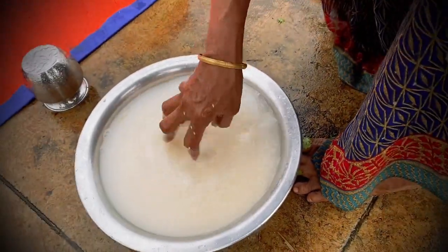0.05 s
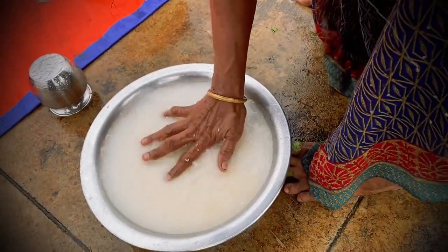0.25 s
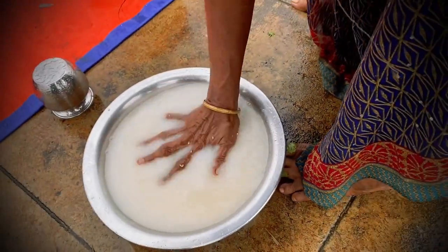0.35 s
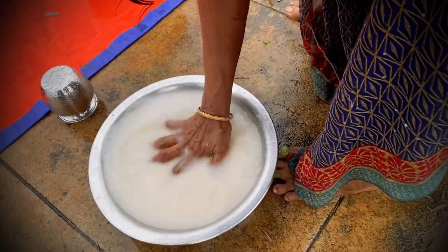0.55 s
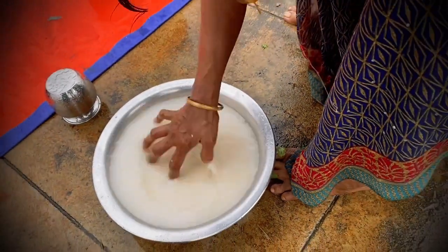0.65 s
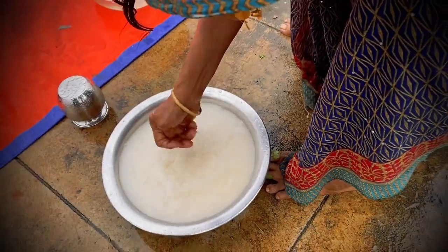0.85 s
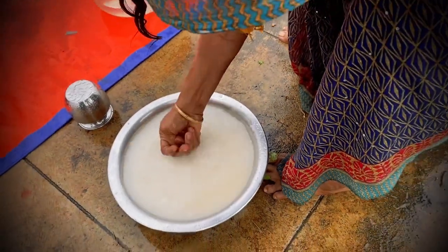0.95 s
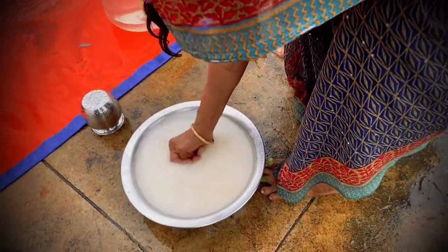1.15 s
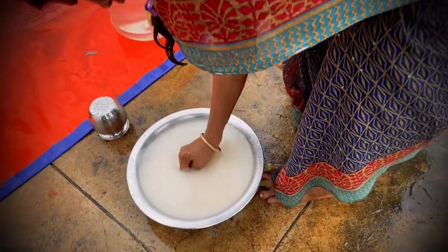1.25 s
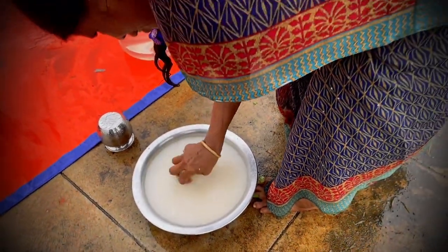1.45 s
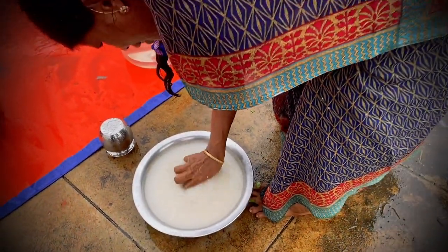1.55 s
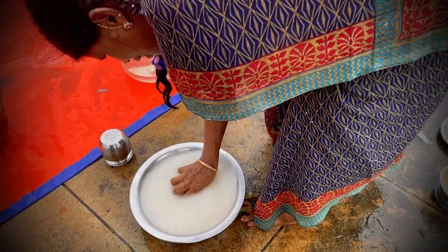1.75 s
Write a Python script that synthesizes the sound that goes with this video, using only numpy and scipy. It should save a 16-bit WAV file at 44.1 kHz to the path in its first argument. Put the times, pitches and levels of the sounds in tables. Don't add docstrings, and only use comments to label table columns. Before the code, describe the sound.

Wet rice is stirred by hand in a steel basin of water outdoors, heard from about a metre above. A slosh and grainy swish open it; at 0.2 s a finger knocks the phone hard, a sharp click with a quick falling sweep, by far the loudest event. Grains pour, bubbles pop from 0.3 to 0.9 s, then quieter swishing, a last soft pour and bubbles near 1.6 s, over faint rumble and hiss.

```python
import sys
import numpy as np
from scipy import signal
from scipy.fft import rfft, irfft
from scipy.io import wavfile
from scipy.ndimage import uniform_filter1d

SR = 44100
rng = np.random.default_rng(int(sys.argv[2]) if len(sys.argv) > 2 else 0)


def level_to_linear(level):
    exponent = np.asarray(level, float) / 20
    return 10 ** exponent


def digitize_waveform(pressure):
    field = np.atleast_2d(pressure).T
    bounded = np.clip(field, -1, 1)
    quanta = np.round(bounded * 32767).astype(np.int16)
    wavfile.write(sys.argv[1], SR, quanta)


N = 79380

# [t/s, swish level/dB, slosh level/dB]
STIR_STROKES = [(0, -50.5, -39.5), (.03, -54, -53), (.16, -52.5, -48.5), (.23, -63.5, -58.5),
                (.38, -52.5, -50.5), (.54, -54.5, -51.5), (.63, -55, -47.5), (.69, -54, -54.5),
                (.78, -53, -62), (.9, -55, -61.5), (1.18, -55.5, -64.5), (1.5, -54, -62.5),
                (1.58, -55, -57.5), (1.8, -54.5, -65)]
# [f/Hz, level/dB]
SWISH_SPECTRUM = [(250, -19.5), (462, -12), (2050, -2), (2620, -4), (7600, -14), (8500, -14.5),
                  (10800, -18), (12800, -20)]
SWISH_TOP_HZ, SWISH_LIKENESS, SWISH_PAN_DB = 12600, 0.13, 3
FLICKER_DB, FLICKER_PER_S, STIPPLE_DB, STIPPLE_PER_S = .8, 60, 1.1, 200
FIZZ_PER_S, FIZZ_DB, FIZZ_SPREAD_DB = 1500, -7, 2.5

# [t/s, level/dB, ring f/Hz, left minus right
# level/dB]
GRAIN_SNAPS = [(.2622, -46, 2200, -1), (.2631, -38, 11000, -1), (.2633, -36, 6100, -1),
               (.2634, -54, 15200, 0), (.2660, -47, 6300, -1), (.2695, -50, 6300, -1),
               (.9627, -48, 9000, 2), (.9636, -44, 10700, 2), (.9638, -47, 4600, 2), (.9640, -59, 15300, 0),
               (.9688, -43, 6000, 4), (.9686, -49, 10300, 2), (.9686, -60, 15300, 0), (.9710, -54, 6500, 2),
               (.9752, -48, 6100, 3), (1.633, -62, 15300, 0),
               (.029, -69, 4500, 2), (.045, -52, 4300, 6), (.118, -50, 6860, 0), (0.158, -49, 4760, 3),
               (0.171, -54.5, 8200, -17), (.2215, -53, 6000, 13), (.284, -50, 5900, 1),
               (.289, -48, 6300, -2), (.348, -53, 9100, -7), (.366, -52, 6000, 10),
               (.455, -52.5, 10100, -6), (0.493, -52, 5860, 3), (.552, -51, 4700, 2),
               (0.684, -49, 7300, -2), (.698, -53.5, 4200, 16), (0.835, -53.5, 6700, 4),
               (1.032, -51, 8860, -4.5), (1.123, -54.5, 4970, 8), (1.225, -52.5, 4700, 4.5),
               (1.632, -49.5, 9800, -1), (1.704, -54.5, 4740, 10)]
TICK_FADE_S, TICK_RING_DB, TICK_WIDTH_HZ, TICK_PURE, SNAP_TOP_HZ = .0009, 12, 1100, .9, 16000

# [t/s, length/s, level/dB]
GRAIN_POURS = [
    (.259, .008, -53),
    (.274, .016, -56),
    (.775, .02, -50),
    (.8, .01, -53),
    (.962, .008, -51),
    (1.281, .048, -63.5),
    (1.61, .08, -60.5),
]
# [f/Hz, level/dB]
POUR_SPECTRUM = [(1500, -7.5), (3000, -7.5), (4000, -5), (6050, -5), (8340, -10.5), (10700, -5),
                 (12600, -7.5), (14000, -28)]
POUR_GRAIN_DB, POUR_GRAINS_PER_S, POUR_RISE_S, POUR_FALL_S = 3.5, 250, .002, .006

# [f/Hz, level/dB]
SLOSH_SPECTRUM = [(200, 2), (400, -12), (800, 2.5), (1500, -0.5), (3000, -37)]
SLOSH_FLICKER_DB, SLOSH_PER_S = 3.5, 60
# [t/s, f/Hz, level/dB, decay/cycles]
WATER_BUBBLES = [(.033, 2950, -49, 14), (.05, 2250, -46, 14), (.086, 2450, -48, 14), (.323, 688, -44, 15),
                 (.35, 650, -41, 8), (.411, 680, -41, 6), (.484, 1340, -37, 5), (.44, 620, -43, 5),
                 (.465, 900, -43, 5), (.505, 1100, -42, 5), (.52, 620, -39, 3), (.548, 760, -42, 5),
                 (.575, 1000, -41, 4), (.595, 700, -35, 3), (.598, 1080, -40, 5), (.622, 1100, -35, 5),
                 (.626, 680, -41, 8), (.638, 1070, -36, 5), (.698, 550, -42, 3), (.778, 2950, -48, 30),
                 (.79, 2950, -47, 12), (.792, 1900, -45, 8), (.804, 2050, -44, 12), (.862, 2700, -41, 12),
                 (1.32, 1320, -47, 6), (1.402, 877, -46, 6), (1.434, 1480, -46, 8), (1.506, 1270, -47, 6),
                 (1.555, 820, -40, 7), (1.59, 880, -43, 10), (1.662, 1330, -44, 5)]
BUBBLE_GLIDE = 0.06

# (t/s, sweep level/dB, click level/dB at the left port)
HARD_KNOCK = (.2092, 4.7, -1.5)
# [t/s, sweep level/dB, click level/dB at the left port]
LIGHT_KNOCKS = [
    (0.1984, -22.5, -37),
    (0.2472, -31.5, -21.5),
    (0.678, -40, -34),
    (0.6786, -46, -30),
    (0.861, -45.5, -35),
    (1.016, -50, -51.5),
]
# [f/Hz, signed share, swell/s, fade/s]
HARD_CLICK_MODES = [(3250, .8, .00014, .0001), (1450, .58, .00001, .0007), (6650, -.3, .00016, .0004),
                    (5750, .16, .001, .0012), (8300, -.08, .0003, .0006)]
# [f/Hz, signed share, swell/s, fade/s]
LIGHT_CLICK_MODES = [(3500, -1.8, .0001, .00018), (1120, -.3, .0001, .0005), (6300, 0.19, .0001, .0002)]
# (f/Hz, signed share, swell/s, fade/s)
RIGHT_CLICK_MODE = (7400, .09, .0002, .0003)
# [f/Hz, level/dB, swell/s, fade/s]
PORT_RINGS = [(5330, -29, .004, .003), (5630, -26, .005, .0035), (5750, -24, .002, .001)]
CLICK_LATE_S, CASE_TOP_HZ = .0005, 9500
SWEEP_RATIO, SWEEP_PHASE, SWEEP_RISE_S, SWEEP_FALL_S = 1.557, -1.06, .0027, .006
RIGHT_SQUEEZE, RIGHT_EARLY_S, RIGHT_DB = .946, .0003, -.7
SWAY_HZ, SWAY_DB, SWAY_S, SWAY_LATE_S = 36, -18, .0095, .0185

# [t/s, length/s, f/Hz, level/dB]
FINGER_SHIFTS = [(.14, .03, 370, -58), (.32, .05, 300, -59), (.413, .05, 230, -54), (.5, .08, 190, -54),
                 (.712, .049, 284, -64), (.855, .04, 180, -59), (1.06, .06, 238, -58),
                 (1.141, .034, 190, -57), (1.2, .05, 100, -62), (1.589, .1, 190, -56.5),
                 (1.648, .04, 60, -61), (1.69, .07, 200, -58), (1.76, .04, 130, -53)]
# [t/s, level/dB]
GRIP_LEVEL = [(0, -53), (.3, -58), (.41, -55), (.49, -52.5), (.59, -58), (.625, -65), (.69, -63.5),
              (.78, -60.5), (.812, -69), (.868, -62.5), (.95, -75), (1.06, -66.5), (1.2, -66),
              (1.36, -68.5), (1.52, -65), (1.6, -60.5), (1.72, -67.5), (1.8, -59.5)]
# [f/Hz, level/dB]
RUMBLE_SPECTRUM = [(12, -41.5), (20, -18.5), (49, 2), (92, 5.5), (190, -3.5), (223, -10.5), (500, -9.5),
                   (650, -47.5), (1100, -120)]
HISS_HZ, HISS_WIDTH_HZ, HISS_DB = 14840, 450, -83.5

# [f/Hz, shared power/0-1]
TREBLE_SHARE = [(7900, 0), (8400, .55), (10100, .55), (10400, .98), (11600, .98), (12000, .45),
                (12700, .75), (13200, 1)]
TREBLE_IN_STEP_HZ, TREBLE_LAG_S, TREBLE_RIGHT_DB = 10850, .00024, -1.5
PORT_LAG_S, MIC_TOP_HZ = 0.00035, 12800
DUCK_DB, DUCK_S = -9, .04


def swish():
    grains = low(bed(SWISH_SPECTRUM, SWISH_LIKENESS, FLICKER_DB, FLICKER_PER_S, FIZZ_DB), SWISH_TOP_HZ, order=40)
    stipple = level_to_linear(STIPPLE_DB * walk(STIPPLE_PER_S))
    return grains * stipple * curve(STIR_STROKES, index=1) * level_to_linear(3.0) * pan(SWISH_PAN_DB)


def ticks():
    length = 1024
    out, u = np.zeros((2, N + length)), np.arange(length) / SR
    for s, db, hz, lr_db in GRAIN_SNAPS:
        noise = np.diff(rng.standard_normal((3, length + 1)))
        noise = noise[0] + .4 * noise[1:]
        rough_ring = signal.lfilter(*signal.iirpeak(hz, hz / TICK_WIDTH_HZ, SR), noise)
        pure_ring = TICK_PURE * np.sqrt(2) * np.sin(2 * np.pi * hz * u)
        own_ring = set_rms(rough_ring, -6) + pure_ring
        burst = set_rms(noise, 0) + set_rms(own_ring, TICK_RING_DB)
        burst = burst * np.exp(-u / TICK_FADE_S) * np.minimum(u / .0003, 1)
        burst = low(burst, max(MIC_TOP_HZ, hz + TICK_WIDTH_HZ), order=8)
        i = int(s * SR)
        out[:, i:i + length] += set_rms(burst, db - 12) * pan(lr_db)
    return low(colour(out[:, :N], [(2000, 0.0037), (16000, 0.004)]), SNAP_TOP_HZ, order=8)


def rustles():
    t, env = np.arange(N) / SR, np.zeros(N)
    for s, length, db in GRAIN_POURS:
        rise = (t - s) / POUR_RISE_S
        fall = (s + length - t) / POUR_FALL_S + 1
        env += level_to_linear(db) * np.clip(np.minimum(rise, fall), 0, 1)
    grains = set_rms(colour(ports(rng.standard_normal((3, N)), .4), POUR_SPECTRUM), 0) * env
    return low(grains * level_to_linear(POUR_GRAIN_DB * walk(POUR_GRAINS_PER_S)), MIC_TOP_HZ, order=20)


def slosh():
    water = low(bed(SLOSH_SPECTRUM, 0.57, SLOSH_FLICKER_DB, SLOSH_PER_S, -3.5), 5000, order=4)
    return water * curve(STIR_STROKES, index=2) * level_to_linear(-3.5)


def bubbles():
    t, out = np.arange(N) / SR, np.zeros(N)
    for s, hz, db, cycles in WATER_BUBBLES:
        n = np.maximum(t - s, 0) * hz
        envelope = np.minimum(n / 2, 1) * np.exp(-2 * n / cycles)
        glide = 1 + BUBBLE_GLIDE * np.minimum(n / cycles, 2) / 2
        out += level_to_linear(db) * envelope * np.sin(2 * np.pi * n * glide)
    return ports(np.array([out, out, out]), 0.93)


def knocks():
    t, out = np.arange(N) / SR, np.zeros((2, N))
    for s, sweep_db, click_db in [HARD_KNOCK, *LIGHT_KNOCKS]:
        modes = HARD_CLICK_MODES if click_db == HARD_KNOCK[2] else LIGHT_CLICK_MODES
        click = sum(ring(t - s - CLICK_LATE_S, *mode) for mode in modes)
        out[0] += level_to_linear(sweep_db) * sweep(t - s) + level_to_linear(click_db) * click
        right_sweep = sweep((t - s + RIGHT_EARLY_S) / RIGHT_SQUEEZE)
        out[1] += level_to_linear(sweep_db + RIGHT_DB) * right_sweep + level_to_linear(click_db) * ring(t - s, *RIGHT_CLICK_MODE)
    u = t - HARD_KNOCK[0]
    for hz, db, swell, fade in PORT_RINGS:
        out[0] += ring(u - CLICK_LATE_S, hz, level_to_linear(db), swell, fade)
    u = np.maximum(u - SWAY_LATE_S, 0)
    out -= level_to_linear(SWAY_DB) * np.exp(-u / SWAY_S) * np.sin(2 * np.pi * SWAY_HZ * u)
    return low(out, CASE_TOP_HZ, order=8)


def ring(u, hz, share, swell, fade):
    return share * np.exp(-np.abs(u) / np.where(u < 0, swell, fade)) * np.cos(2 * np.pi * hz * u)


def sweep(u):
    u = np.maximum(u, 1e-6)
    phase = np.pi * np.log(u * 1000) / np.log(SWEEP_RATIO) + SWEEP_PHASE
    return (1 - np.exp(-(u / SWEEP_RISE_S) ** 2)) * np.exp(-u / SWEEP_FALL_S) * np.sin(phase)


def shifts():
    t, out = np.arange(N) / SR, np.zeros(N)
    for s, length, hz, db in FINGER_SHIFTS:
        rub = set_rms(colour(rng.standard_normal(N), [(hz / 1.21, 0), (hz * 0.94, 0)]), db)
        out += rub * np.clip(np.minimum(t - s, s + length - t) / 0.01 + 1, 0, 1)
    return out


def rumble():
    handling = low(bed(RUMBLE_SPECTRUM, .9, 1.9, 25, -6.5), 2200, order=4)
    return handling * curve(GRIP_LEVEL, index=1) * level_to_linear(1.5)


def hiss():
    near, far = HISS_WIDTH_HZ, 2 * HISS_WIDTH_HZ
    band = [(HISS_HZ - far, -80), (HISS_HZ - near, 0), (HISS_HZ + near, 0), (HISS_HZ + far, -80)]
    return set_rms(colour(rng.standard_normal((2, N)), band), HISS_DB)


def gain_dip():
    u = np.arange(N) / SR - HARD_KNOCK[0]
    return level_to_linear(DUCK_DB * (u > 0) * np.exp(-np.abs(u) / DUCK_S))


def joined(x):
    f, (left, right) = np.arange(N // 2 + 1) * SR / N, rfft(x)
    share = np.interp(f, *np.array(TREBLE_SHARE).T)
    early = left * level_to_linear(TREBLE_RIGHT_DB) * np.exp(2j * np.pi * (f - TREBLE_IN_STEP_HZ) * TREBLE_LAG_S)
    return np.array([x[0], irfft(np.sqrt(share) * early + np.sqrt(1 - share) * right, N)])


def bed(points, likeness, flicker_db, rate, fizz_db):
    hits = rng.random((3, N)) < FIZZ_PER_S / SR
    sizes = level_to_linear(FIZZ_SPREAD_DB * rng.exponential(size=(3, N)))
    fizz = hits * sizes * rng.choice([-1, 1], (3, N))
    noise = rng.standard_normal((3, N)) + set_rms(fizz, fizz_db)
    x = rfft(colour(ports(noise, likeness), points))
    octave = np.log2(np.maximum(np.arange(N // 2 + 1) * SR / N, 1) / 30)
    out = np.zeros((2, N))
    for k in range(11):
        band = irfft(x * np.maximum(1 - np.abs(octave - k), 0), N)
        out += band * level_to_linear(flicker_db * walk(rate))
    return set_rms(out, 0)


def ports(common, likeness):
    c = np.clip(likeness, 0, 1)
    late = np.roll(common[0], int(PORT_LAG_S * SR))
    return np.sqrt(c) * np.array([late, common[0]]) + np.sqrt(1 - c) * common[1:]


def pan(db):
    return level_to_linear(np.array([[db / 2], [-db / 2]]))


def set_rms(x, db):
    return x * level_to_linear(db) / np.sqrt(np.mean(x ** 2))


def curve(table, index):
    rows = np.array(table)
    return level_to_linear(np.interp(np.arange(N) / SR, rows[:, 0], rows[:, index]))


def walk(rate):
    k = int(SR / rate)
    held = np.repeat(rng.standard_normal(N // 50), k)[:N]
    return 1.8 * uniform_filter1d(uniform_filter1d(held, k), k)


def colour(x, points):
    hz, db = np.array(points).T
    f = np.maximum(np.arange(N // 2 + 1) * SR / N, 1)
    octaves_out = np.log2(np.maximum(hz[0] / f, 1)) + np.log2(np.maximum(f / hz[-1], 1))
    return irfft(rfft(x) * level_to_linear(np.interp(np.log(f), np.log(hz), db) - 21 * octaves_out), N)


def low(x, hz, order):
    return signal.sosfilt(signal.butter(order, hz, fs=SR, output="sos"), x)


def scene():
    steady = swish() + slosh() + rumble() + hiss() + shifts()
    return joined(steady * gain_dip() + ticks() + rustles()) + knocks() + bubbles()


def top_cut(x):
    return signal.sosfilt(signal.butter(12, 16940, fs=SR, output="sos"), x)


def record(dry):
    return top_cut(dry)


dry = scene()
out = record(dry)
digitize_waveform(out)
```